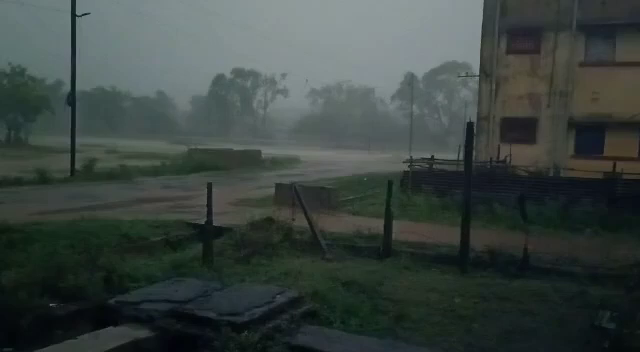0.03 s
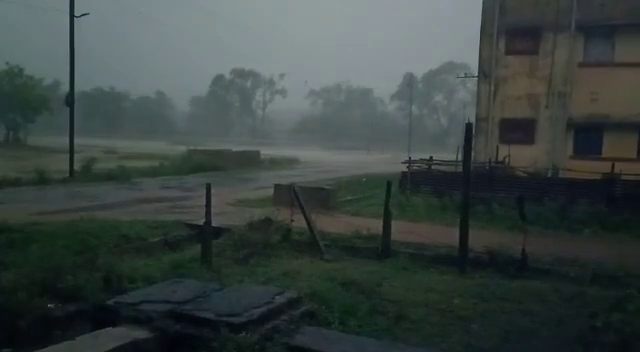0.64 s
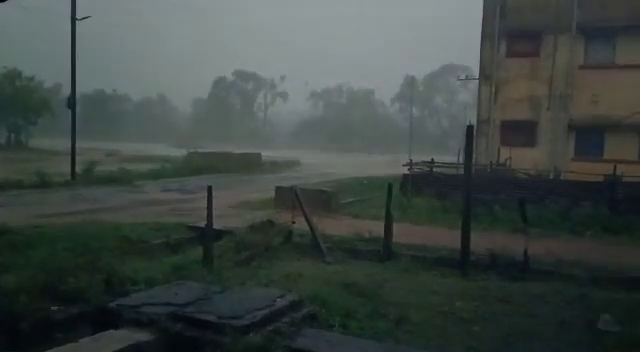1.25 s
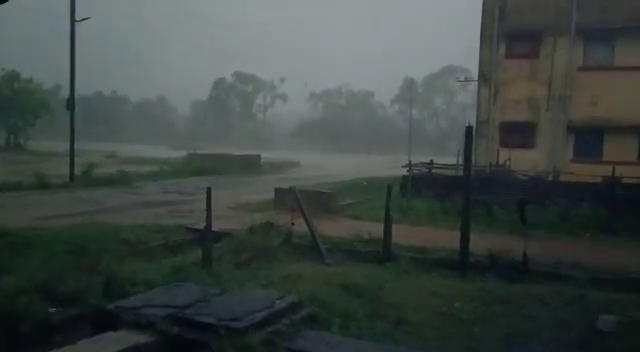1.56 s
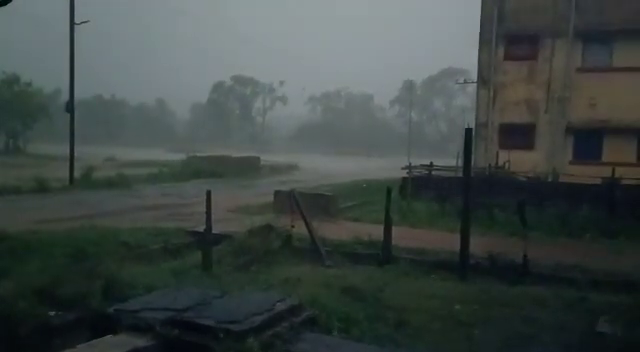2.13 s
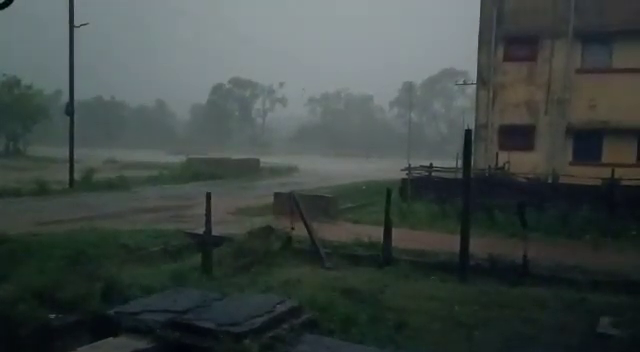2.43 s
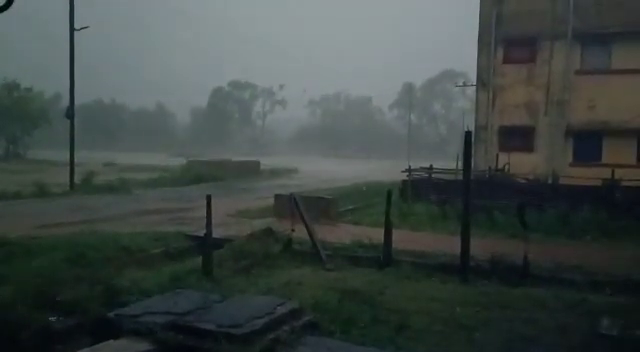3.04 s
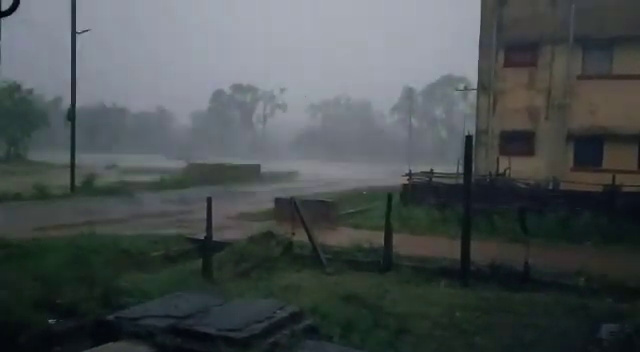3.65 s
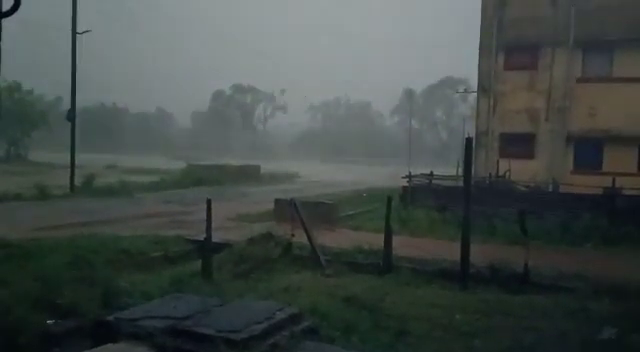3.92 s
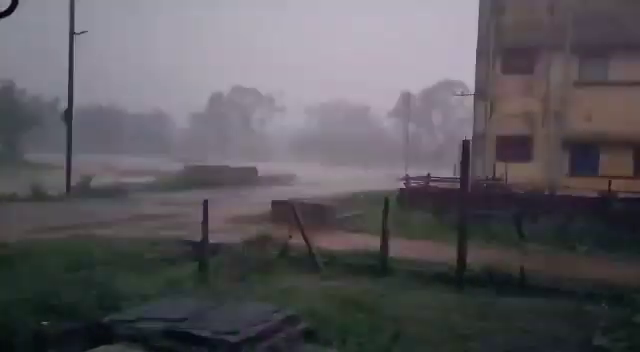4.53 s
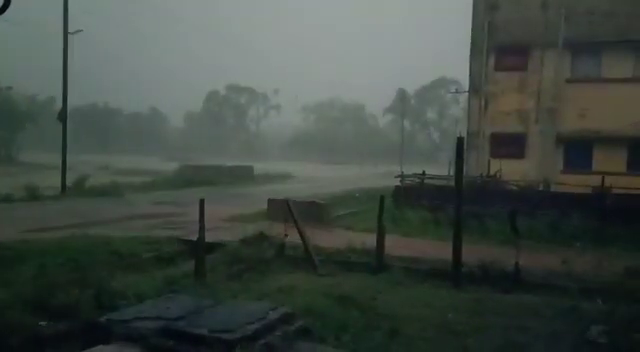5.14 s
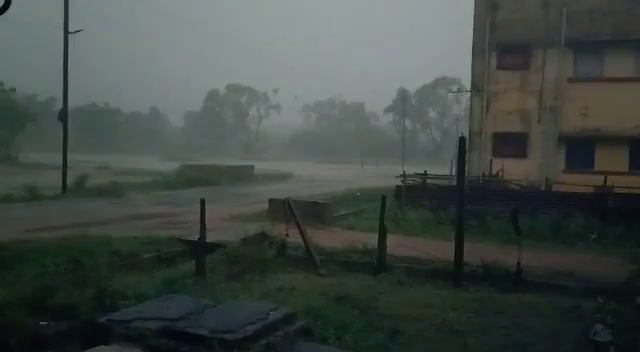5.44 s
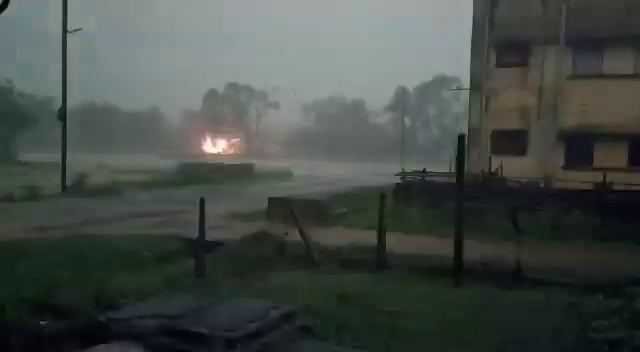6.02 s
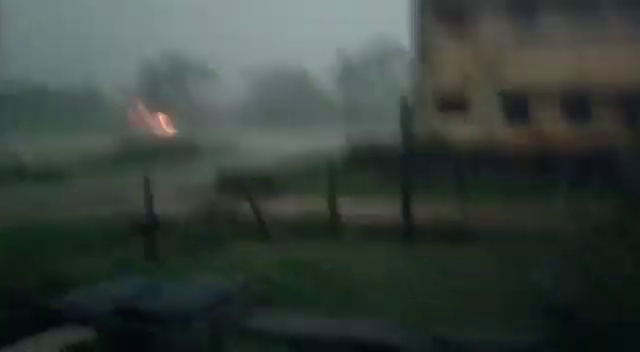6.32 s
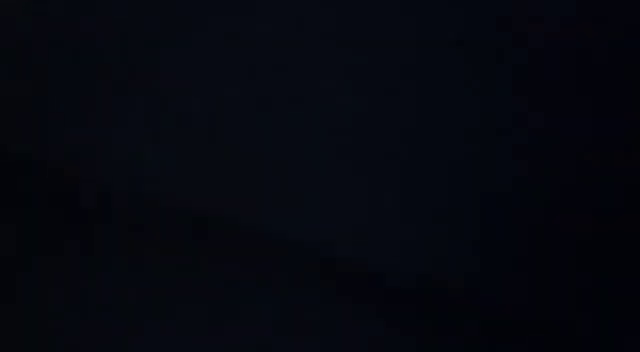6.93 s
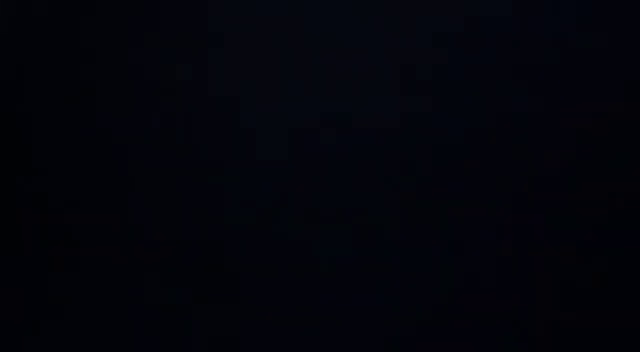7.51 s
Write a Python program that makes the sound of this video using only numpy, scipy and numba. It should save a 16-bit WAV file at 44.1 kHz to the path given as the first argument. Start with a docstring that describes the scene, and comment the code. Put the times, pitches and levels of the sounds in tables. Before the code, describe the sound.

Heavy rain washes steadily over an open field while fat drops from a roof edge splash close to the microphone. Distant thunder rumbles and thumps low behind it. About six seconds in, a brief sizzle leads into a very loud, tearing crack of nearby lightning that overloads the microphone. More claps follow in a darkening roll, and the rain sounds much quieter to the end.

```python
"""Heavy rain washes over an open field, heard under a roof edge where fat drops splash close by.
Far thunder, worn down by the air, rolls and thumps. Near 6.2 s thin branches of a discharge sizzle;
then lightning hits the trees across the field: a tearing crack that overloads the microphone,
more claps from the kinks of the channel, and a darkening roll.
The gain control ducks under the crack and holds the rain down to the end."""
import sys
import numpy as np
from scipy import signal
from scipy.fft import rfft, irfft
from scipy.io import wavfile
from numba import njit

SR = 44100
rng = np.random.default_rng(int(sys.argv[2]) if len(sys.argv) > 2 else 0)


def put_to_file(sound):
    """Save the sound as 16-bit audio at rate SR, in the file named by the first command-line argument."""
    columns = np.atleast_2d(sound).T  # one column per channel
    safe = np.clip(columns, -1, 1)
    whole_steps = np.round(safe * 32767)
    wavfile.write(sys.argv[1], SR, whole_steps.astype(np.int16))


N = 342657

# spectra of the boom, the tearing and the overload crackle: freq_hz, relative_db
BOOM_SPECTRUM = [(15, -62), (25, -34), (43, -38.5), (86, -6), (129, -9.5), (261, 0), (362, -6), (444, -9.5),
                 (575, -3.5), (659, -9.5), (730, -4.5), (1050, -14), (1500, -24), (1950, -39), (3300, -120)]
TEAR_SPECTRUM = [(760, -41.5), (1300, -5.5), (1530, -8), (2200, 0.5), (2650, -4.5), (2780, -6.5),
                 (3140, -12.5), (3430, -16.5), (5400, -18), (5720, -15), (6560, -30), (9000, -49.5),
                 (11700, -53), (19800, -120)]
OVERLOAD_SPECTRUM = [(6000, 8), (8000, -3.5), (11000, -4.5), (15500, -10)]
# claps from the kinks of the channel: crest_s, relative_db, rise_s, fade_s, tear_share_db
CHANNEL_CLAPS = [(6.328, -5, 0.00094, 0.045, -2.5), (6.356, -2, 0.0011, 0.031, -4.5),
                 (6.386, -8, 0.0012, 0.093, 1.5), (6.435, -6.5, 0.079, 0.033, -7),
                 (6.548, -24, 0.0052, 0.043, 11), (6.6004, -10.5, .0004, 0.039, 4),
                 (6.63, -8.5, 0.013, 0.057, -1.5), (6.725, -21, 0.031, .05, 5.5),
                 (6.768, -12, 0.0058, 0.041, -9), (6.79, -18.5, 0.0091, 0.012, 7),
                 (6.822, -13, 0.0028, 0.019, -6.5), (6.897, -21, 0.0026, 0.012, -6),
                 (6.982, -19, 0.0057, 0.012, -4.5), (7.045, -24.5, 0.015, 0.1, 0),
                 (7.105, -20, .004, 0.0077, -13), (7.17, -21.5, 0.027, 0.08, -18),
                 (7.2835, -18, 0.00011, 0.0011, 8.5), (7.296, -17.5, 0.016, 0.019, -11),
                 (7.33, -23, .006, 0.048, -7.5), (7.703, -34, .004, 0.051, -5)]

def strike(start_s=6.324, gain_db=16.0, sharp_rise_s=0.01):
    """Each kink of the channel sends its own shock: booming, tearing claps over a fading roll."""
    age_s = np.arange(N) / SR - start_s
    onset = np.clip(age_s / 0.0024, 0, 1)
    # the roll comes from ever higher up the channel; the air takes its treble first
    boom_fade_db_per_s, tear_fade_db_per_s = 12.5, 19.5
    boom_power = undb(-19 - boom_fade_db_per_s * age_s) ** 2
    tear_power = undb(-15.5 - tear_fade_db_per_s * age_s) ** 2
    front_power = 0
    for crest_s, level_db, rise_s, fade_s, tear_share_db in CHANNEL_CLAPS:
        clap_power = surge(crest_s, level_db, rise_s, fade_s)
        rip_power = clap_power * undb(tear_share_db) ** 2
        boom_power += clap_power
        tear_power += rip_power
        front_power += rip_power / (1 + (rise_s / sharp_rise_s) ** 2)
    boom_env, tear_env, front_env = (onset * np.sqrt(p) for p in (boom_power, tear_power, front_power))
    clicks = impacts(rate_per_s=3000, spread_db=1.0)
    shocks = unit(clicks + 1.1 * spatter(rate_per_s=560, spread_db=-1.5, fade_s=0.015))
    boom = boom_env * colour(impacts(rate_per_s=3100, spread_db=1.7), BOOM_SPECTRUM)
    tear = tear_env * colour(shocks, TEAR_SPECTRUM)
    # direct fronts keep their treble
    snap = front_env * unit(band(shocks, 5390, 5990))
    # fine overload crackle on the loudest claps; it dies first as the level falls
    crackle = tear_env ** 2.6 * colour(shocks, OVERLOAD_SPECTRUM)
    # dull echoes off the land outlast the direct shocks
    echoes = boom_env ** 0.39 * unit(band(impacts(rate_per_s=900, spread_db=4.0), 180, 384))
    mix = undb(1.6) * boom + tear + undb(-9) * snap + undb(-3) * crackle + undb(-20.5) * echoes
    return undb(gain_db) * mix


# spurts of sizzle: crest_s, level_db
SIZZLE_SPURTS = [(6.185, -33), (6.252, -31.5), (6.28, -22), (6.324, -22)]

def sizzle(rise_s=0.0061, fade_s=0.011):
    """The nearest thin branches of the discharge crackle in spurts just ahead of the main shock."""
    crackle = spatter(rate_per_s=1100, spread_db=-1.5, fade_s=0.0041)
    power = sum(surge(crest_s, level_db, rise_s, fade_s) for crest_s, level_db in SIZZLE_SPURTS)
    return np.sqrt(power) * (colour(crackle, TEAR_SPECTRUM) + undb(-3) * colour(crackle, SPLASH_SPECTRUM))


# spectra of the far rumble and the growl above it: freq_hz, relative_db
RUMBLE_SPECTRUM = [(15, -57.5), (25, -31), (81, -6), (98, -1.5), (130, -8.5), (184, 1.5), (230, -4),
                   (330, -12.5), (502, -22), (549, -19), (637, -39), (900, -41), (1170, -42), (1980, -120)]
GROWL_SPECTRUM = [(280, -2.5), (400, -3), (600, -4), (900, -18)]
# swells of far thunder: crest_s, level_db, rise_s, fade_s, growl_share_db
THUNDER_SWELLS = [(0.88, -40.5, 0.11, 0.22, -16), (1.72, -34, 0.54, 0.73, -10),
                  (2.2, -29.5, .04, 0.47, -10.5), (2.92, -28.5, 0.18, 0.17, -15),
                  (3.14, -24, 0.15, 0.3, -30), (3.58, -36, .1, .7, -6), (5.442, -32.3, 0.064, 0.15, -31),
                  (6.25, -38, 0.49, 0.35, -8.5), (7.55, -28, .15, .5, -5)]
# single far shocks: start_s, level_db, pitch_hz
THUNDER_THUMPS = [(1.7637, -10.5, 198), (1.807, -6, 418), (1.812, -15, 382), (1.954, -14.5, 273),
                  (2.165, -12, 537)]

def far_thunder(floor_db=-42.5):
    """Shocks from miles away, worn down by the air to a rolling rumble; a few arrive as single thumps."""
    rumble_power, growl_power = undb(floor_db) ** 2, 0
    for crest_s, level_db, rise_s, fade_s, growl_share_db in THUNDER_SWELLS:
        rumble_power += surge(crest_s, level_db, rise_s, fade_s)
        growl_power += surge(crest_s, level_db + growl_share_db, rise_s, fade_s)
    rumble_env = np.sqrt(rumble_power)
    bass_env = undb(-5) * rumble_env ** 2 / rumble_env.max()  # bass swells faster than the rest
    rumble = rumble_env * colour(impacts(rate_per_s=700, spread_db=2.0), RUMBLE_SPECTRUM)
    bass = bass_env * unit(band(impacts(rate_per_s=760, spread_db=1.5), 65.5, 133, order=4))
    growl = np.sqrt(growl_power) * colour(impacts(rate_per_s=600, spread_db=-1.0), GROWL_SPECTRUM)
    thumps = np.zeros(N)
    for start_s, level_db, pitch_hz in THUNDER_THUMPS:
        cycles = np.arange(SR // 20) / SR * pitch_hz
        push_pull = np.sin(2 * np.pi * cycles) * np.exp(-(cycles / 0.68) ** 2)
        add(thumps, start_s, undb(level_db) * push_pull)
    return rumble + bass + growl + band(thumps, 63, 940)


# low and high microphone resonances that each drop sets ringing: centre_hz, width_hz
MIC_RESONANCES = [(2500, 820), (5250, 1400)]
# near drops, relative levels: hit_s, low_resonance_db, high_resonance_db
ROOF_DROPS = [(0.0462, -32.5, -28), (0.0843, -43, -33), (0.128, -50, -32.5), (0.356, -39, -32.5),
              (0.426, -35, -33), (0.539, -34.5, -28), (1.547, -41, -34), (2.4374, -32.5, -39),
              (3.061, -28.5, -32.5), (3.2762, -42, -32), (3.3994, -36, -31), (3.4348, -48, -33.5),
              (3.8558, -31.5, -39), (4.787, -54, -36), (4.9762, -34, -21.5), (5.1714, -40, -30),
              (5.453, -37.5, -28.5), (5.553, -39, -33), (5.719, -51, -31), (6.0908, -38, -30),
              (6.1553, -36, -33)]

def roof_drops(slap_s=0.0013, scatter_s=0.007, gain_db=-9.5):
    """Fat drops from the roof edge: a slap as each flattens, a rebound, then droplets scatter."""
    out = np.zeros(N)
    t = np.arange(SR // 10) / SR - slap_s
    scatter = np.maximum(1 - np.exp(-t / slap_s), 0) * np.exp(-t / scatter_s)
    for hit_s, low_db, high_db in ROOF_DROPS:
        rebound_s = rng.uniform(0.003, 0.006)
        slap, rebound = (np.exp(-np.abs(t - peak_s) / slap_s) for peak_s in (slap_s, rebound_s))
        burst = rng.standard_normal(len(t)) * (slap + 0.16 * rebound + scatter)
        mic_ring = sum(undb(level_db) * unit(band(burst, hz - width_hz / 2, hz + width_hz / 2))
                       for (hz, width_hz), level_db in zip(MIC_RESONANCES, (low_db, high_db)))
        tick = undb(high_db - 20) * unit(band(burst, 5900, 15000))
        add(out, hit_s - slap_s, mic_ring + tick)
    return undb(gain_db) * out


# spectra of the far wash, the near splashes and their spray: freq_hz, relative_db
WASH_SPECTRUM = [(210, -44.5), (350, -5), (421, -5.5), (543, -6.5), (858, -8), (956, -8.5), (1030, -8),
                 (1440, -12.5), (1910, -1.5), (2300, 1), (3600, -13), (4680, -83), (7920, -120)]
SPLASH_SPECTRUM = [(1760, -30), (3000, -6), (3320, -25.5), (3600, -7), (4720, -5), (5450, 0.5), (6020, -6),
                   (7760, -24.5), (8500, -28.5), (11000, -41.5), (18700, -120)]
SPRAY_SPECTRUM = [(4410, -17), (7500, -14.5), (8420, -10.5), (9480, -6), (10700, -7.5), (12500, -3),
                  (13500, -2), (15800, -4)]
# gusts driving the rain towards the roof edge: time_s, strength_db
RAIN_GUSTS = [(0.25, 2), (0.7, 2.5), (1.08, 4), (1.5, -0.5), (2.25, -1.5), (2.65, -6.5), (3.55, -1.5),
              (4.15, 3.5), (4.65, -0.3), (5.5, 0.1), (5.9, -1), (6.2, 1)]

def rain(wash_db=-38.5, splash_db=-39, spray_db=-50.5, ease_db_per_s=0.21):
    """Far drops blend into a wash; near ones splash and throw spray. Gusts move the nearest most."""
    t = np.arange(N) / SR
    gust = undb(np.interp(t, *np.transpose(RAIN_GUSTS)))
    far = unit(rng.standard_normal(N) + 0.74 * spatter(rate_per_s=300, spread_db=0, fade_s=0.0078))
    near = rng.standard_normal(N) + 0.86 * spatter(rate_per_s=190, spread_db=6.0, fade_s=0.012)
    near = unit(near + 0.32 * impacts(rate_per_s=690, spread_db=3.5))
    wash = undb(wash_db - ease_db_per_s * (t - t.mean())) * gust ** 0.29 * colour(far, WASH_SPECTRUM)
    splashes = undb(splash_db) * gust ** 0.56 * colour(near, SPLASH_SPECTRUM)
    spray = undb(spray_db) * gust * colour(near, SPRAY_SPECTRUM)
    # the microphone retreats indoors; the wall shades the splashes slightly
    indoors_s, retreat_s, shade_db = 7.0, 0.6, -0.5
    indoors = np.clip(1 + (t - indoors_s) / retreat_s, 0, 1)
    return wash + undb(shade_db * indoors) * splashes + spray


def impacts(rate_per_s, spread_db):
    """Randomly timed impulses of random size and sign; rms 1."""
    sizes = undb(spread_db * np.minimum(rng.exponential(size=N), 4))
    hits = rng.random(N) < rate_per_s / SR
    return unit(hits * sizes * rng.choice([-1, 1], N))


def spatter(rate_per_s, spread_db, fade_s):
    """Impacts that each burst into fading noise; rms 1."""
    pole = np.exp(-2 / (fade_s * SR))
    power = signal.lfilter([1], [1, -pole], impacts(rate_per_s, spread_db) ** 2)
    return unit(np.sqrt(power) * rng.standard_normal(N))


def surge(crest_s, level_db, rise_s, fade_s):
    """Power envelope: exponential rise to a crest, exponential fade."""
    t = np.arange(N) / SR - crest_s
    decay = np.minimum(np.maximum(-t / rise_s, t / fade_s), 20)
    return (undb(level_db) * np.exp(-decay)) ** 2


def colour(x, spectrum, taps=4096, skirt_db_per_octave=30):
    """Minimum-phase filter through (freq_hz, relative_db) points, falling away beyond them; rms 1."""
    freq_hz, relative_db = np.transpose(spectrum)
    octaves = np.log2(np.maximum(np.arange(taps // 2 + 1) * SR / taps, 1))
    points = np.log2(freq_hz)
    octaves_outside = np.abs(octaves - np.clip(octaves, points[0], points[-1]))
    gain = undb(np.interp(octaves, points, relative_db) - skirt_db_per_octave * octaves_outside)
    cepstrum = irfft(np.log(gain))
    cepstrum[1:taps // 2] *= 2
    cepstrum[taps // 2 + 1:] = 0
    response = irfft(np.exp(rfft(cepstrum)))
    return unit(signal.fftconvolve(x, response)[:N])


def band(x, lo_hz, hi_hz, order=2):
    """Causal band-pass."""
    return signal.sosfilt(signal.butter(order, [lo_hz, hi_hz], "band", fs=SR, output="sos"), x)


def add(out, start_s, sound):
    """Mix a short sound in at start_s."""
    i = int(start_s * SR)
    out[i:i + len(sound)] += sound[:N - i]


def undb(db):
    """Decibels to gain."""
    return 10 ** (np.asarray(db) / 20)


def unit(x):
    """Scale to rms 1."""
    return x / np.sqrt(np.mean(x ** 2))


@njit
def follow(rectified, attack_s, release_s):
    """Level follower with separate rise and fall times."""
    out, level = np.empty(len(rectified)), 0.
    for i in range(len(rectified)):
        lag_s = attack_s if rectified[i] > level else release_s
        level += (rectified[i] - level) / (lag_s * SR)
        out[i] = level
    return out


def scene():
    """The whole storm at one microphone."""
    return (rain() + roof_drops() + far_thunder() + sizzle() + strike())[None]


def record(dry, start_s=0.038, threshold=0.19, max_duck_db=19.0, ceiling=0.66, collapse=1.0):
    """Gain control ducks under the crack and recovers slowly; peaks clip, the worst collapse to zero."""
    x = dry * (np.arange(N) / SR > start_s)
    level = follow(np.abs(x[0]), attack_s=0.005, release_s=3.0)
    x = x * np.clip(threshold / np.maximum(level, threshold), undb(-max_duck_db), 1)
    x = signal.resample_poly(x, 3, 1, axis=1)
    dropout_gain = 0.5 - 0.5 * np.tanh((np.abs(x) - collapse) / 0.1)
    x = np.clip(x, -ceiling, ceiling) * dropout_gain
    # the input stage rounds the edges and blocks the deepest bass
    x = signal.sosfilt(signal.butter(2, [25, 14000], "band", fs=3 * SR, output="sos"), x)
    x = signal.resample_poly(x, 1, 3, axis=1)
    top_hz = 15850
    return signal.sosfilt(signal.ellip(10, 0.2, 80, top_hz, fs=SR, output="sos"), x)


dry = scene()
out = record(dry)
put_to_file(out)
```